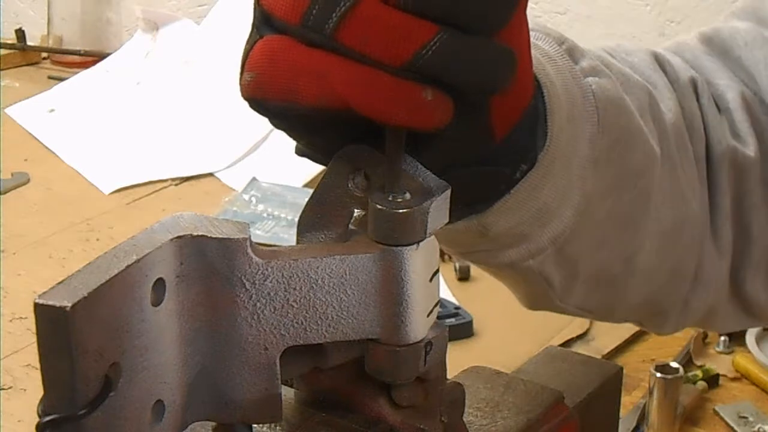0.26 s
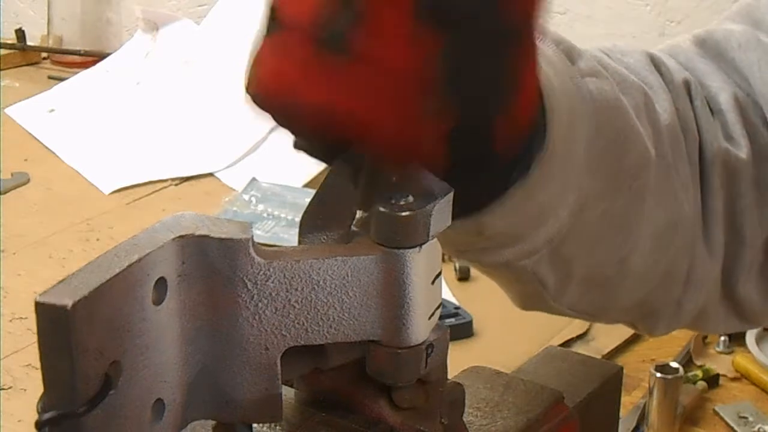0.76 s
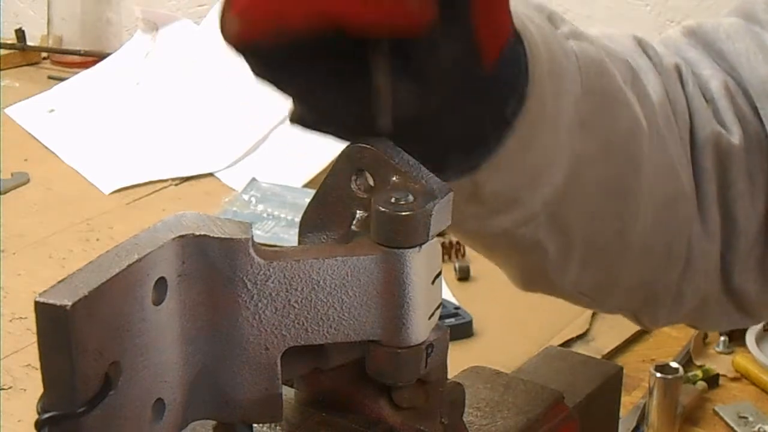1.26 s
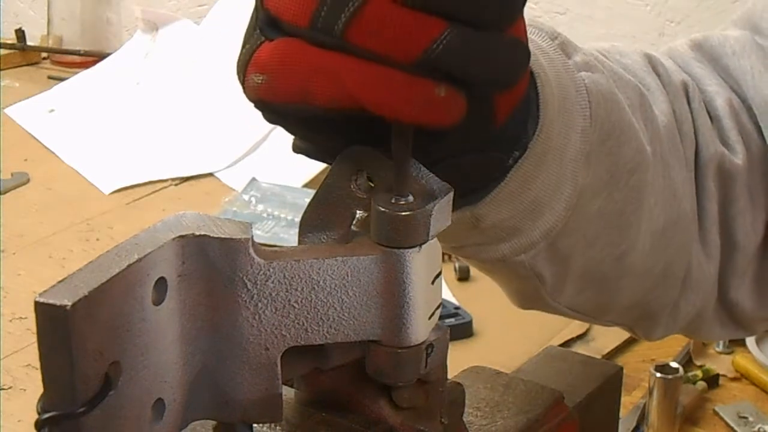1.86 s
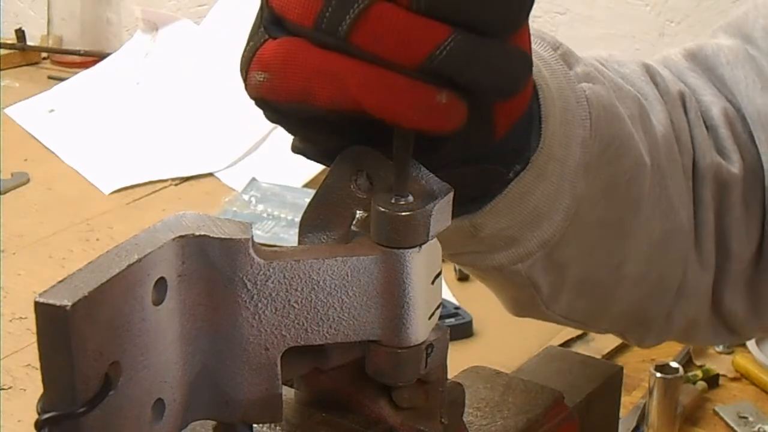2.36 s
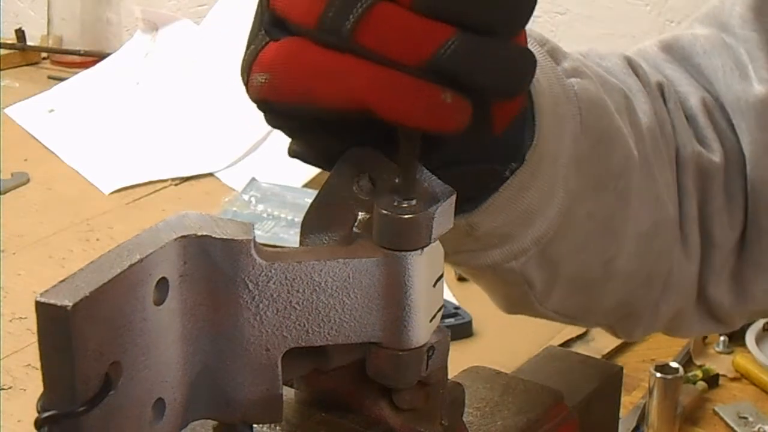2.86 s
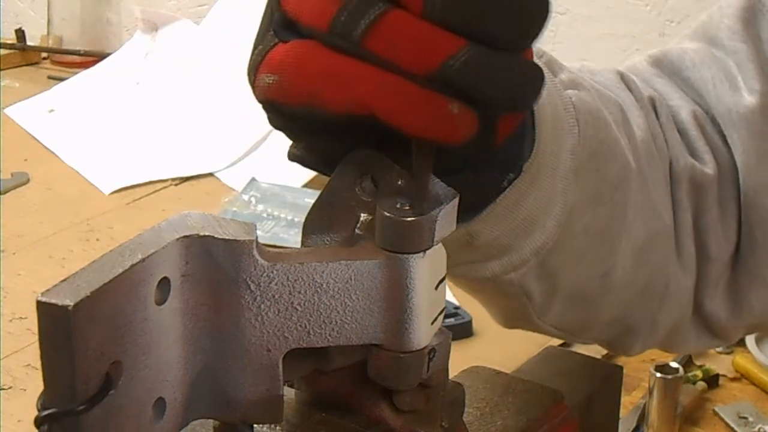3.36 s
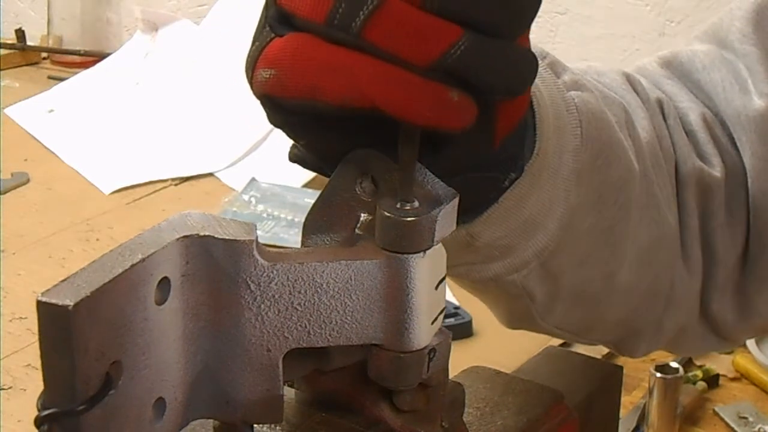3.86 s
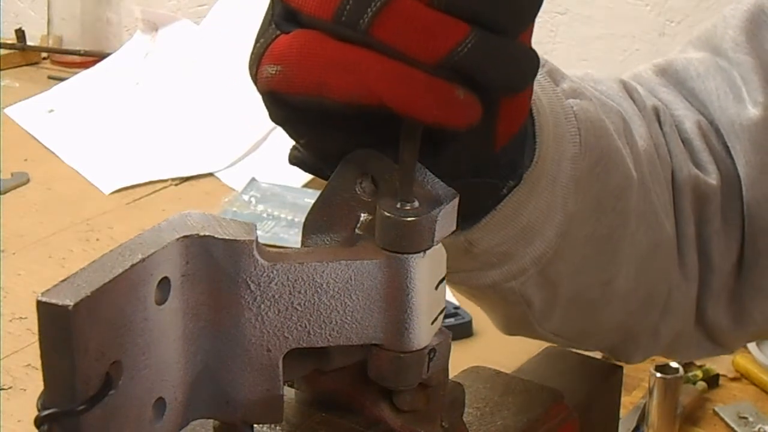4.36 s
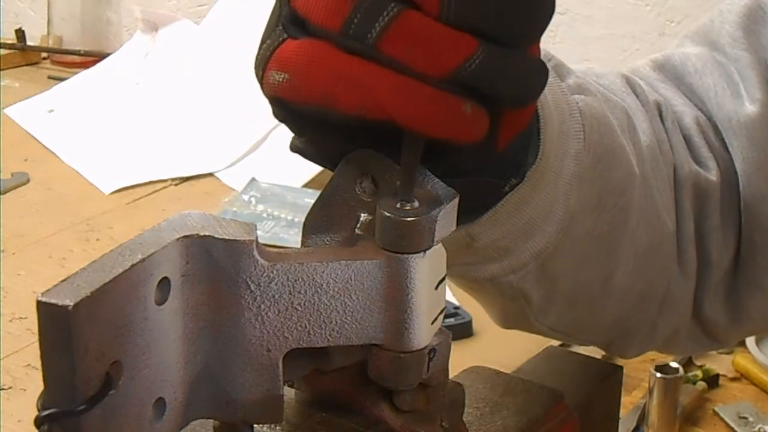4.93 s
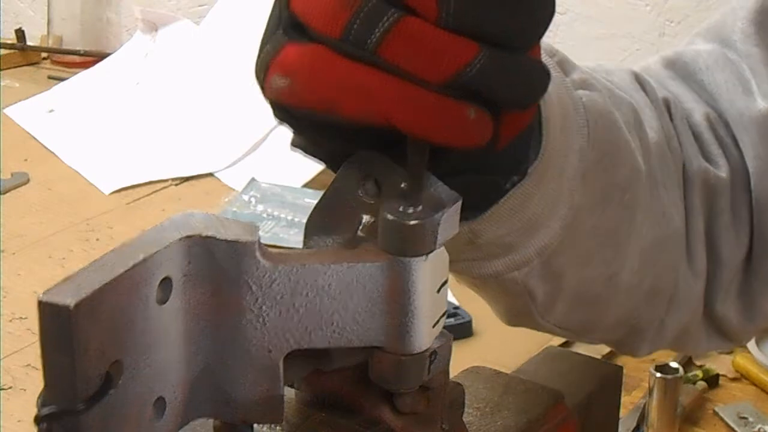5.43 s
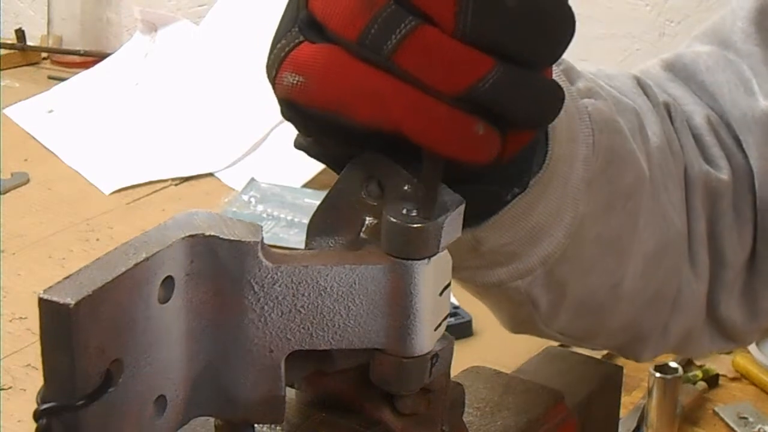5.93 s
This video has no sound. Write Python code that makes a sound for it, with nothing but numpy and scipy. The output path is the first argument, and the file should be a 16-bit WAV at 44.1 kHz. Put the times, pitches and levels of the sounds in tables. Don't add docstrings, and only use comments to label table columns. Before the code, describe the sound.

Hammer blows drive a steel punch against a pin in a vised hinge: a pair, another pair, then a final three. Each is a sharp crack with rattling clang, low thump and short dense room tail, harshly distorted by a close, overloaded recorder. Between them are light metal ticks, a bench knock, faint scrapes, glove brushes and sleeve rustle over soft room air.

```python
import sys
import numpy as np
from scipy import signal
from scipy.fft import rfft, irfft, next_fast_len
from scipy.io import wavfile
from scipy.ndimage import uniform_filter1d

SR = 44100
rng = np.random.default_rng(int(sys.argv[2]) if len(sys.argv) > 2 else 0)


def output_pcm(signal):
    pcm = np.clip(np.atleast_2d(signal).T, -1, 1) * 32767
    wavfile.write(sys.argv[1], SR, np.round(pcm).astype(np.int16))


def ratio(d):
    e = np.asarray(d, float) / 20
    return 10 ** e


N = 272979

# (frequency [Hz], density [dB per Hz])
AIR_SPECTRUM = [(150, -41), (250, -14.5), (312, -17), (569, -11.5), (769, -10.5), (1050, -11), (1570, -9),
                (1720, -10), (2250, -10), (2720, -13), (8110, -27), (11000, -40.5), (14200, -71.5),
                (22000, -120)]
# (frequency [Hz], width [Hz], level [dB])
FAN_WHISTLE = (2260, 220, -9)
# (frequency [Hz], density [dB per Hz])
HUM_SPECTRUM = [(12, -54), (20, -29), (49, -1.5), (87, -10.5), (242, 0), (264, -10), (400, 0), (520, -29),
                (880, -120)]
# (frequency [Hz], density [dB per Hz])
SLEEVE_SPECTRUM = [(180, -46), (300, -12), (344, -2.5), (457, -2.5), (618, -2), (3940, -1.5), (8880, -21),
                   (9720, -26.5), (11000, -52), (14200, -76.5), (22000, -120)]
# (start [s], level [dB], hold [s], fade [dB per s])
ARM_MOVES = [
    (-.1, -48, 0.34, 62.5),
    (.33, -59, .2, 32.5),
    (0.99, -52.5, 0.057, 37),
    (1.195, -59.5, .15, 16.5),
    (2.372, -51, .19, 38.5),
    (2.6, -60, .2, 18),
    (3.64, -61, 0.16, 11),
    (3.873, -53.5, .15, 18.5),
]
# (time [s], level [dB], frequency [Hz])
BENCH_BUMPS = [
    (0.256, -53.5, 65),
    (2.459, -68, 61.8),
    (3.88, -61, 59),
]
# (frequency [Hz], t60 [s])
ROOM_T60 = [(60, 0.2), (160, 0.32), (420, 0.25), (1100, 0.24), (2900, 0.23), (6000, 0.25), (8500, 0.11),
            (10500, 0.12)]

# (time [s], peak [dB], crack centre [Hz], ring [dB], room [dB])
TOUCHES = [(0.2364, -42, 8200, -30, -6), (2.061, -47, 4150, -24, -10), (2.4178, -29, 2300, -27, -4),
           (3.4304, -13.5, 2120, -31, -3.5), (3.4315, -33, 4200, -9, -12), (3.4417, -13, 4200, -18.5, -2),
           (3.4445, -26, 4400, -10, -2), (3.6064, -54, 4300, -13, 15.5), (4.5094, -52, 2300, -12, 4),
           (4.7257, -47, 2510, -13.5, 12), (5.3742, -47.5, 3480, -22, -6)]
# (frequency [Hz], level [dB], t60 [s])
TOUCH_MODES = [(427, -15, 0.057), (725, -18.5, 0.055), (830, -7.5, 0.054), (1040, -15, 0.054),
               (2270, 1, 0.015), (2398, 0.5, 0.033), (3190, -34, 0.071), (4280, 10, 0.023),
               (4340, -22, 0.11), (5365, -13, 0.19), (5590, -10.5, 0.1), (6000, -8, 0.099),
               (7560, -0.5, 0.0082), (8800, 3.5, 0.016)]
# (time [s], peak [dB], crack centre [Hz], ring [dB], room [dB])
KNOCKS = [
    (3.861, -23.5, 1500, -14, 3),
    (3.871, -36.5, 1500, -13, -23),
]
# (frequency [Hz], level [dB], t60 [s])
KNOCK_MODES = [(330, -21, 0.23), (470, -23, 0.22), (630, -12, 0.045), (787, -0.5, 0.041),
               (1000, -20, 0.074), (1118, -10, 0.073), (1260, 0.5, 0.044), (1500, -13, 0.026),
               (1740, -14, 0.45), (1822, -0.5, 0.16), (1930, 7.5, 0.057), (2400, -15, 0.11),
               (3700, -2, 0.026), (4300, -2, 0.014)]
# (time [s], peak [dB], crack centre [Hz], ring [dB], room [dB])
SET_DOWN = [
    (1.887, -34, 1780, -6, 0.52),
]
# (frequency [Hz], level [dB], t60 [s])
SET_DOWN_MODES = [(480, -15, 0.076), (820, -8, 0.066), (996, 4.5, 0.031), (1100, -11, .08),
                  (1500, 3.5, 0.028), (1860, 9.5, 0.024), (4300, 0, 0.013)]
# (time [s], peak [dB], crack centre [Hz], ring [dB], room [dB])
REBOUND = [
    (1.0409, -30, 3300, -17, 2.8),
]
# (frequency [Hz], level [dB], t60 [s])
REBOUND_MODES = [(640, -11, .12), (800, -9, .14), (990, -9, .12), (2150, -5, .05), (3020, -2, .1),
                 (3600, -5, .05), (4300, -7, .1), (5000, -5, .12), (5780, 3, .1), (7400, -3, .04)]

# (time [s], strength [dB], punch ring [dB], punch travel to pin [ms], rattle length [ms])
BLOWS = [
    (0.5168, -1, 3, .1, 14),
    (.8101, 1.5, 2.5, 3.5, 21),
    (2.8152, 2.5, 4, 3.5, 20),
    (3.1528, 2.5, 4, 4.2, 20),
    (5.4814, 3, 5.5, 3.1, 20),
    (5.8324, 1, 7.5, 5.5, 33),
    (6.1608, 4, 0, .1, 24),
]
# (frequency [Hz], level [dB], t60 [s])
PUNCH_MODES = [(7375, -12, .035), (7362, -26.5, .26), (7405, -26, .23), (4320, -23, .15), (4190, -25, .11),
               (5140, -25, .13), (5385, -31, .25), (3685, -28, .15), (6480, -31, .27), (1690, -24, .02),
               (8200, -24, .008)]
# (frequency [Hz], level [dB], t60 [s])
HINGE_MODES = [(318, -20.5, .16), (357.1, -14.5, 0.091), (394.5, -18.5, 0.061), (624.6, -23, 0.18),
               (678, -23.5, 0.27), (782, -17, 0.15), (807.5, -22, 0.18), (1031, -21, 0.26),
               (1231, -18.5, 0.19), (1307, -19, 0.11), (1652, -21, 0.11), (1981, -22, .16),
               (2172, -26.5, 0.12)]
# (frequency [Hz], density [dB per Hz])
BOOM_SPECTRUM = [(18, -58), (30, -22), (64, -10.5), (98, -25), (169, -12.5), (206, -24.5), (321, -6),
                 (401, -2.5), (442, -6.5), (999, -1.5), (1080, -2.5), (4080, -6), (7570, -15), (11000, -57),
                 (14200, -89), (22000, -120)]
# (frequency [Hz], level [dB], t60 [s])
CLANG_MODES = [(357, -1, .1), (640, 0, .1), (775, 1, .12), (1024, 0, .1), (1303, 0, .1), (1680, 1, .13),
               (1934, 2, .14), (2175, -3, .1), (3678, -1, .1), (4335, 3, .12), (4593, -1, .1),
               (5135, 0, .12), (5385, 0, .15), (7387, 5, .15)]
# (frequency [Hz], level [dB], t60 [s])
VISE_HUM_MODES = [(314, -47, .5), (454, -50, 1), (647, -49.5, 0.45), (773, -43.5, 1), (1042, -48.5, 0.37)]

# (time [s], half length [s], level [dB], centre [Hz], width [octaves])
SLIDES = [
    (1.045, 0.019, -46.5, 2010, 1.4),
    (3.445, 0.0019, -32, 2990, 2.7),
]
# (time [s], half length [s], level [dB], centre [Hz], width [octaves])
BRUSHES = [
    (1.36, 0.08, -59.5, 4300, 0.35),
    (2.17, 0.019, -51.5, 3500, 1.2),
    (2.417, 0.03, -56, 2520, 1.5),
    (5.148, 0.01, -65, 3800, 0.096),
]


def at_hz(points, hz):
    points_hz, values = np.transpose(points)
    return np.interp(np.log(hz), np.log(points_hz), values)


def rms_one(x):
    return x / np.sqrt(np.mean(x ** 2) + 1e-20)


def coloured(spectrum):
    size = next_fast_len(N)
    hz = np.arange(1, size // 2 + 2) * SR / size
    white = rfft(rng.standard_normal(size))
    return rms_one(irfft(white * ratio(at_hz(spectrum, hz)), size)[:N])


def band(x, centre_hz, octaves):
    half_octaves = np.array([-.5, .5]) * np.clip(octaves, .05, 5)
    edges_hz = np.clip(centre_hz * 2 ** half_octaves, 20, 11000)
    return signal.sosfilt(signal.butter(2, edges_hz, "band", fs=SR, output="sos"), x)


def ring(clicks, hz, t60_s):
    r = ratio(-60 / (t60_s * SR))
    w = 2 * np.pi * hz / SR
    return signal.lfilter([0, np.sin(w)], [1, -2 * r * np.cos(w), r * r], clicks + 1e-18)


def struck(times_s, levels_db, modes, spread_db, size=N):
    out = np.zeros(size)
    luck = rng.standard_normal((len(times_s), 2, len(modes)))
    at = (np.asarray(times_s) * SR).astype(int)
    for k, (hz, mode_db, t60_s) in enumerate(modes):
        strength = ratio(levels_db + mode_db + spread_db * luck[:, 0, k])
        clicks = np.zeros(size)
        clicks[at] = strength * np.sign(luck[:, 1, k])
        out += ring(clicks, hz, t60_s)
    return out


def loose(x, length_s):
    span = int(length_s * SR)
    throb = uniform_filter1d(rng.standard_normal(len(x)), size=span)
    return x * rms_one(uniform_filter1d(throb, size=span))


def room_response(spectrum, build_s, hold_s=0):
    t = np.arange(SR // 2) / SR
    out = np.zeros(len(t))
    edges_hz = 25 * 2 ** np.arange(0, 9.1, 1 / 3)
    white = rng.standard_normal((2, SR * 2 // 3))
    for k, (low, high) in enumerate(zip(edges_hz, edges_hz[1:])):
        third_octave = signal.butter(2, [low, high], "band", fs=SR, output="sos")
        noise = signal.sosfilt(third_octave, white[k % 2])[-len(t):]
        hz = np.sqrt(low * high)
        decay_db = 60 * np.maximum(t - hold_s, 0) / at_hz(ROOM_T60, hz)
        out += noise * ratio(at_hz(spectrum, hz) - decay_db)
    out = out * (1 - np.exp(-t / build_s))
    return out / np.sqrt(np.sum(out ** 2))


def movement():
    attack_s = 0.039
    t, power = np.arange(N) / SR, 0
    for s, level_db, hold_s, fade_db_per_s in ARM_MOVES:
        rise = np.clip((t - s) / attack_s, 0, 1)
        fade_db = fade_db_per_s * np.maximum(t - s - hold_s, 0)
        power = power + (rise * ratio(level_db - fade_db)) ** 2
    return np.sqrt(power)


def ducking(loud):
    depth_db, from_db, release_db_per_s = 4, -49, 116
    level_db = 10 * np.log10(uniform_filter1d(loud ** 2, size=400) + 1e-12)
    ramp_db = release_db_per_s * np.arange(N) / SR
    held_db = np.maximum.accumulate(level_db + ramp_db) - ramp_db
    return ratio(-np.clip(held_db - from_db, 0, depth_db))


def background(duck):
    air_db, swish_db, cloth_db, hum_db = -57.5, -2, -4.5, -71
    moving = movement()
    fan_hz, width_hz, whistle_db = FAN_WHISTLE
    whistle = rms_one(ring(rng.standard_normal(N), fan_hz, 5.2 / width_hz))
    air_level = np.hypot(ratio(air_db) * duck, ratio(swish_db) * moving)
    air = air_level * (coloured(AIR_SPECTRUM) + ratio(whistle_db) * whistle)
    fibres = ratio(1.5 * rms_one(uniform_filter1d(rng.standard_normal(N), size=300)))
    sleeve = ratio(cloth_db) * moving * coloured(SLEEVE_SPECTRUM) * fibres
    bumps = np.zeros(N)
    for s, level_db, hz in BENCH_BUMPS:
        bumps += struck([s], level_db, [(hz, 0, .35), (1.6 * hz, -5, .15)], spread_db=0)
    return air + ratio(hum_db) * coloured(HUM_SPECTRUM) + sleeve + bumps


def taps(rows, modes, room):
    out = np.zeros(N)
    t = np.arange(len(room)) / SR
    middle_hz = np.sqrt(modes[0][0] * modes[-1][0])
    for s, peak_db, crack_hz, ring_db, room_db in rows:
        burst = rng.standard_normal(len(t)) * np.exp(-t / 0.001)
        crack = ratio(peak_db + 2.0) * band(burst, crack_hz, octaves=1.26)
        rings = struck([0], peak_db + ring_db, modes, spread_db=1, size=len(t))
        rings = band(rings, middle_hz, octaves=4)
        rings = 1.3 * rings + 0.66 * loose(rings, 0.0069)
        echo = signal.fftconvolve(crack + .5 * rings, room)[:len(room)]
        sound = crack + rings + ratio(room_db) * echo
        start = int(s * SR)
        out[start:start + len(room)] += sound[:N - start]
    return out


def hammer():
    thump_db, crash_db, face_db, clang_db = -7, 22.5, -14.5, -50
    hit_s, strength_db, ring_db, travel_ms, rattle_ms = np.transpose(BLOWS)
    seated_s = hit_s + np.abs(travel_ms) / 1000
    punch = struck(hit_s, ring_db, PUNCH_MODES, spread_db=2)
    punch = punch + .5 * loose(punch, .006)
    hinge = struck(seated_s, strength_db, HINGE_MODES, spread_db=3.5)
    # (frequency [Hz], level [dB], t60 [s])
    bench_modes = [(45.34, -31.5, 0.1), (58.6, -28.5, 0.39), (117, -24.0, 0.09)]
    thump = struck(seated_s, strength_db + thump_db, bench_modes, spread_db=3.0)
    boom = np.zeros(N + SR)
    for hit, seat, level_db, length_ms in zip(hit_s, seated_s, strength_db, rattle_ms):
        chatter = room_response(BOOM_SPECTRUM, build_s=0.0063, hold_s=length_ms / 1000)
        crash = ratio(level_db + crash_db) * chatter
        boom[int(seat * SR):][:len(crash)] += crash
        boom[int(hit * SR):][:len(crash)] += ratio(face_db) * crash
    boom = boom[:N]
    clang = sum(ratio(clang_db + mode_db) * ring(boom, hz, t60_s) for hz, mode_db, t60_s in CLANG_MODES)
    drone = loose(struck(seated_s, strength_db, VISE_HUM_MODES, spread_db=4.5), 0.0096)
    return punch + hinge + boom + clang + thump + drone


def brushes(rows, ring_db):
    out, t = np.zeros(N), np.arange(-SR // 4, SR // 4) / SR
    for s, half_s, level_db, centre_hz, octaves in rows:
        friction = rng.standard_normal(len(t)) * rng.exponential(1, len(t))
        swell = ratio(level_db) * np.exp(-.5 * (t / half_s) ** 2)
        sound = swell * rms_one(band(friction, centre_hz, octaves))
        for hz, mode_db, t60_s in TOUCH_MODES:
            sound += ratio(ring_db + mode_db - 24.5) * ring(swell * friction, hz, t60_s)
        out[int((s + t[0]) * SR):][:len(t)] += sound
    return out


def scene():
    # (frequency [Hz], density [dB per Hz])
    wall_spectrum = [(100, -19.0), (700, 12.0), (4000, -6.5), (10000, -9.0)]
    walls = room_response(wall_spectrum, build_s=0.0074)
    small = taps(TOUCHES, TOUCH_MODES, walls) + taps(KNOCKS, KNOCK_MODES, walls)
    small += taps(SET_DOWN, SET_DOWN_MODES, walls) + taps(REBOUND, REBOUND_MODES, walls)
    work = hammer() + small + brushes(SLIDES, ring_db=-16) + brushes(BRUSHES, ring_db=-38)
    return (work + background(ducking(work)))[None]


def top_cut(x):
    return signal.sosfilt(signal.butter(12, 11110, fs=SR, output="sos"), x)


def record(dry):
    held, top, limiter_s, lowpass_hz = .36, .72, 0.0037, 11200
    pole = np.exp(-1 / (limiter_s * SR))
    level = np.sqrt(signal.lfilter([1 - pole], [1, -pole], dry ** 2))
    limited = dry / (1 + (level / held) ** 8) ** .125
    rounded = limited / (1 + (limited / top) ** 4) ** .25
    flipped = np.repeat(np.abs(limited[:, ::2]) > 2.1 * held, 2, axis=1)[:, :N]
    wrapped = np.where(flipped, -rounded, rounded)
    lowpass = signal.cheby2(8, 30, lowpass_hz, fs=SR, output="sos")
    smooth = signal.sosfiltfilt(lowpass, wrapped)
    return top_cut(np.clip(smooth, -1, 1))


dry = scene()
out = record(dry)
output_pcm(out)
```